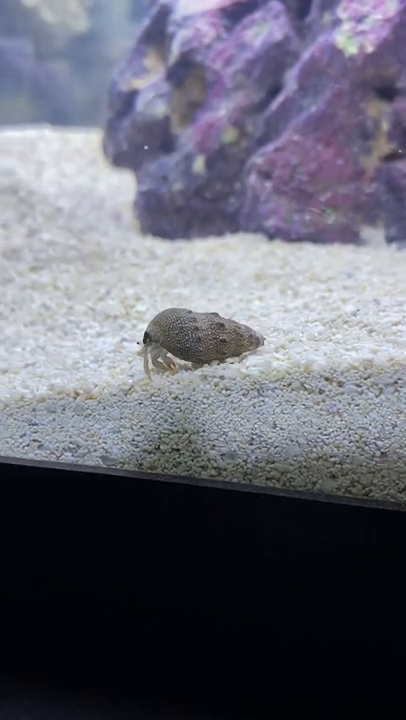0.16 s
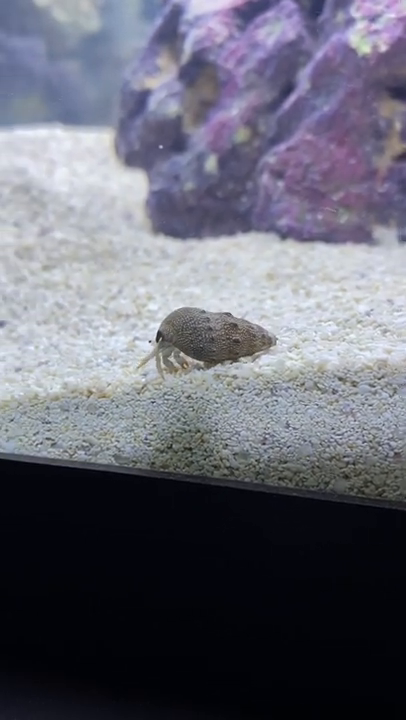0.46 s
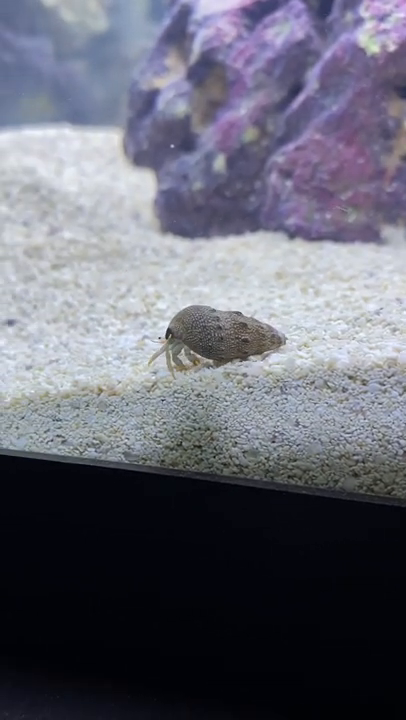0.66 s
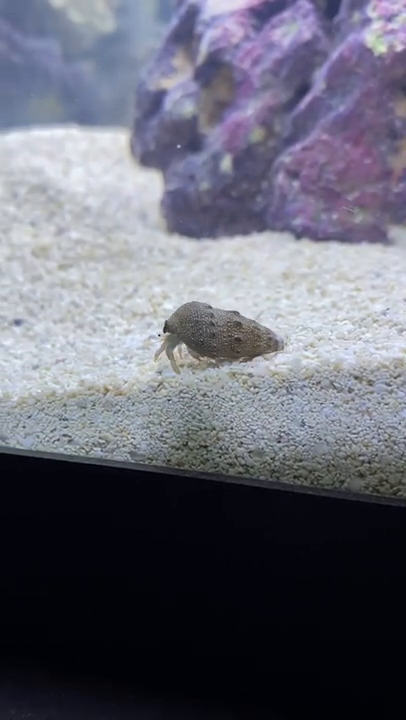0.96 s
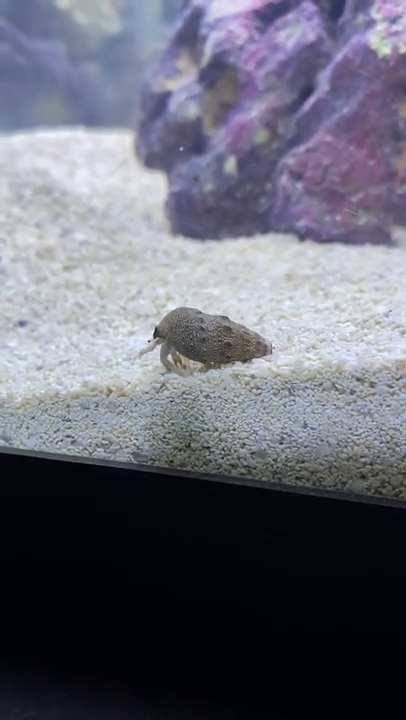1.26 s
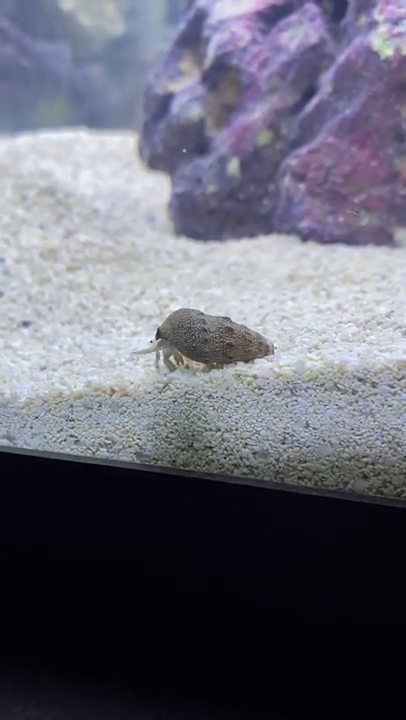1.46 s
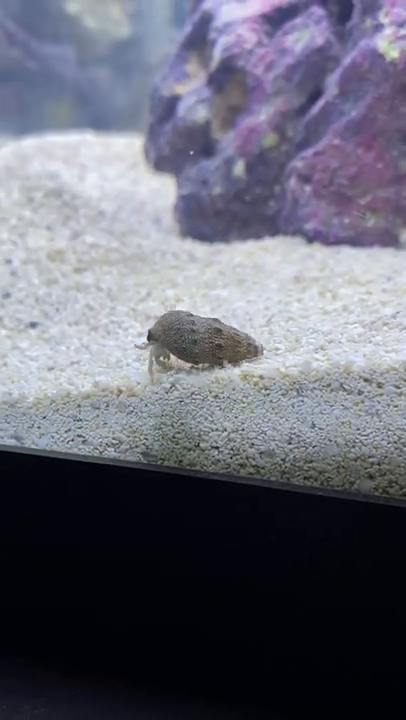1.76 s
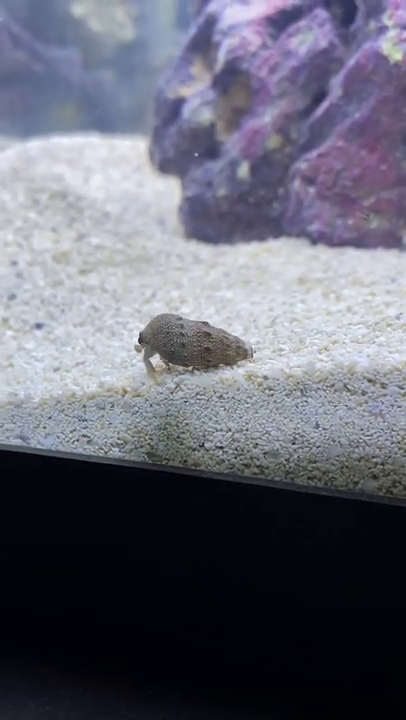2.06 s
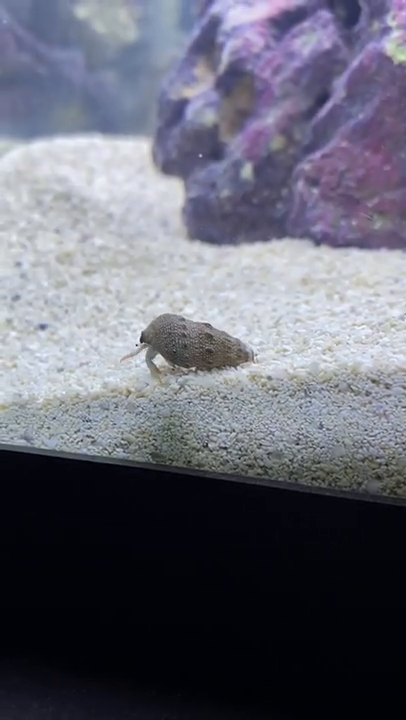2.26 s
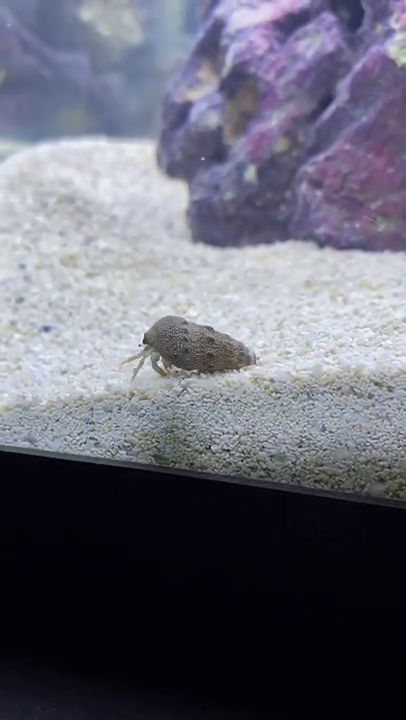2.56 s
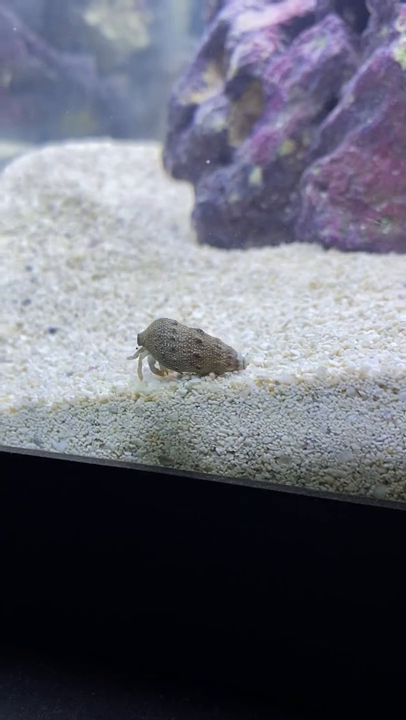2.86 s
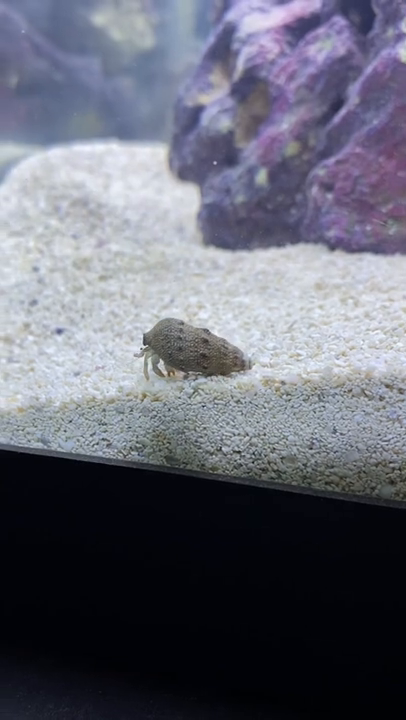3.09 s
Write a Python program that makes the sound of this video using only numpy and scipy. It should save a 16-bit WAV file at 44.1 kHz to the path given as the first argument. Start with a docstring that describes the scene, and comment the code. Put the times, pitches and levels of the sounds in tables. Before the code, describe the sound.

A steady low aquarium pump hum with gurgling filter water and irregular small clicks.

```python
"""An aquarium pump hums steadily in a small room, heard from just outside the tank.
Water rushes and burbles through the filter: shaped noise and short rising notes.
The impeller chatters on every turn, noise bursts ringing the housing; now and then it ticks sharply
in short runs, as if catching air: shaped noise cracks. A few tiny bubbles burst as pops and narrow fizz."""
import sys
import numpy as np
from scipy import signal
from scipy.fft import rfft, irfft
from scipy.io import wavfile
from scipy.ndimage import uniform_filter1d

SR = 44100
rng = np.random.default_rng(int(sys.argv[2]) if len(sys.argv) > 2 else 0)


def persist_wave(psi):
    """Save psi, clipped to +-1, as 16-bit WAV."""
    counts = np.round(np.clip(psi, -1, 1) * 32767).astype(np.int16)
    wavfile.write(sys.argv[1], SR, np.atleast_2d(counts).T)


N = 142443

TURN_HZ = 60.0


def amp(db):
    """Decibels to gain."""
    return 10 ** (np.asarray(db) / 20)


def evened(x):
    """Scales to an rms of one."""
    return x / np.sqrt(np.mean(x ** 2) + 1e-30)


def read(points, hz):
    """Reads a table along a logarithmic frequency axis."""
    f, value = np.transpose(points)
    return np.interp(np.log(hz + 1), np.log(f + 1), value)


def add(mix, start_s, sound):
    """Mixes a sound in at a given time."""
    part = mix[..., max(round(start_s * SR), 0):][..., :sound.shape[-1]]
    part += sound[..., :part.shape[-1]]


def coloured(x, points):
    """Filters by a table of frequency in Hz and gain in dB."""
    gain = amp(read(points, np.fft.rfftfreq(N, 1 / SR)))
    return irfft(rfft(x) * gain, N)


def drift(rate_hz):
    """Slow random motion, rms one, fading out above a rate."""
    hz = np.fft.rfftfreq(N, 1 / SR)
    lowpass = (hz > 0) / (1 + (hz / rate_hz) ** 4)
    return evened(irfft(rfft(rng.standard_normal(N)) * lowpass, N))


def follow(curve, share):
    """A gain of rms one that takes a share of a level curve's swings in dB."""
    s, db = np.transpose(curve)
    return evened(amp(share * np.interp(np.arange(N) / SR, s, db)))


def steadied(x, span_s):
    """Keeps a sound's level even over stretches longer than the span."""
    power = uniform_filter1d((x ** 2).mean(0), round(span_s * SR))
    power = uniform_filter1d(power, round(span_s * SR / 2))
    return x * np.sqrt(power.mean() / power)


def stereo_noise():
    """White noise as it reaches both microphones: alike in the bass, the middle leaning left."""
    # Likeness of the two microphones. Each row: frequency in Hz, likeness 0-1.
    likeness = [(130, .998), (280, .93), (450, .77), (700, .58), (950, .72), (1300, .4), (1600, .6),
                (2000, .85), (2500, .92), (3800, .55), (5500, .55), (6800, .92), (12000, .92)]
    # Balance of the two microphones. Each row: frequency in Hz, left minus right in dB.
    balance = [(150, -.2), (400, 0), (620, 3), (950, 3.8), (1400, 1.5), (2000, .3), (2500, 1.5), (3200, 0)]
    hz = np.fft.rfftfreq(N, 1 / SR)
    mid, side = rfft(rng.standard_normal((2, N)))
    same = np.clip(read(likeness, hz), 0, 1)
    lean = amp(read(balance, hz) / 2)
    mid = mid * np.sqrt((1 + same) / 2)
    side = side * np.sqrt((1 - same) / 2)
    return irfft(np.array([(mid + side) * lean, (mid - side) / lean]), N)


def room(x, apart=0.23):
    """Two wall echoes and a short diffuse tail, both duller than the direct sound."""
    # Reflections. Each row: delay in seconds, level in dB before dulling.
    echoes = [(0.0233, -13), (.068, -22)]
    t60_s, tail_db, onset_s = 0.21, -8, 0.0057
    t = np.arange(SR // 2) / SR
    tail = rng.standard_normal(len(t)) + apart * rng.standard_normal((2, len(t)))
    tail *= amp(-60 * t / t60_s) * np.minimum(t / onset_s, 1)
    tail *= amp(tail_db) / np.linalg.norm(tail[0])
    for delay_s, db in echoes:
        add(tail, delay_s, amp(db) * np.ones((2, 1)))
    wet = signal.fftconvolve(x, tail, axes=1)[:, :N]
    return coloured(wet, [(5000, -3), (10000, -2.0), (14000, -13)])  # Hz, dB


def hiss():
    """A faint, even hiss: shaped noise."""
    # Spectrum. Each row: frequency in Hz, density in dB per Hz.
    hiss_spectrum = [(2500, -130), (3700, -124), (5500, -125.5), (6400, -126), (7400, -135), (8600, -130),
                     (10200, -129), (12000, -132), (13000, -146), (15000, -160)]
    return coloured(stereo_noise(), hiss_spectrum) * np.sqrt(SR / 2)


def rumble():
    """A low uneven rumble of room and cabinet, surging together with the motor's shake at its turn rate."""
    # Spectrum of the bed before levelling. Each row: frequency in Hz, density in dB per Hz.
    rumble_spectrum = [(18, -104), (30, -101.5), (47, -74.5), (75, -79.5), (100, -77.5), (157, -78),
                       (200, -87.5), (400, -104), (1000, -140)]
    # Surges of the rumble; only the swings count. Each row: time in seconds, level in dB.
    rumble_level = [(0.03, -56), (0.11, -62.5), (0.22, -54), (0.42, -54.5), (.49, -48.5), (.65, -57),
                    (1.03, -47.5), (1.32, -56.5), (1.55, -50), (1.77, -61), (1.93, -51.5), (2.15, -56.5),
                    (2.3, -54.5), (2.45, -58), (2.61, -54.5), (2.72, -49), (2.8, -55), (3.0, -49.5),
                    (3.1, -59.5), (3.17, -52.5)]
    shake_db, wander_turns, steady_s, follow_share = -60, 0.087, 0.1, 0.85
    bed = coloured(stereo_noise(), rumble_spectrum) * np.sqrt(SR / 2)
    turns = TURN_HZ * np.arange(N) / SR + wander_turns * drift(7.2)
    shake = np.sqrt(2) * amp(shake_db) * np.cos(2 * np.pi * turns)
    return steadied(bed + shake, steady_s) * follow(rumble_level, follow_share)


def rush():
    """Flowing water: shaped noise, swelling a little and shifting in time-frequency patches."""
    # Spectrum of the water in the filter. Each row: frequency in Hz, density in dB per Hz.
    rush_spectrum = [(100, -110), (200, -87.5), (275, -80.5), (355, -89), (440, -87), (520, -92),
                     (640, -90.5), (790, -95), (1020, -99), (1150, -103), (1300, -110), (1700, -112),
                     (2150, -110), (2600, -111), (2850, -119), (3300, -119), (3650, -128), (5500, -140),
                     (9000, -170)]
    swell_db, patch_db = 1.34, 1.12
    z = signal.stft(stereo_noise(), nperseg=512)[2]
    patches = rng.standard_normal(z.shape[:0:-1])  # frames, bins
    patches = uniform_filter1d(patches, size=7, axis=0)
    patches = evened(uniform_filter1d(patches, size=5, axis=1)).T
    flow = signal.istft(z * amp(patch_db * patches), nperseg=512)[1][:, :N]
    return coloured(flow, rush_spectrum) * np.sqrt(SR / 2) * amp(swell_db * drift(6.1))


def burble():
    """Soft low bubbles shed one after another in the flow, each a short rising note."""
    per_s, base_db, range_db, tilt_db = 80, -70, 9.5, 1.5
    decay_cycles, glide, spread = 3, 0.08, 0.61
    low_hz, high_hz = 230, 1000
    out, t = np.zeros((2, N)), np.arange(3000) / SR
    draws = rng.random((round(per_s * N / SR), 4))
    for k, (late, pitch, size, side) in enumerate(draws):
        hz = low_hz * (high_hz / low_hz) ** pitch
        age = t * hz / decay_cycles
        note = np.sin(2 * np.pi * hz * t * (1 + glide * age / 2))
        note *= np.exp(-age) * np.minimum(2 * age, 1)
        level = amp(base_db + range_db * size ** 2 - tilt_db * pitch)
        pan = 1 + spread * (side - 0.5) * np.array([[1], [-1]])
        add(out, (k + 2 * late) / per_s, note * level * pan)
    return out


def water():
    """Rush and steadied burble make one flow that swells slowly."""
    # Swells of the flow; only the swings count. Each row: time in seconds, level in dB.
    flow_level = [(0, -55.5), (.32, -56), (.6, -57), (1.05, -55.5), (1.2, -54.5), (1.36, -59.5),
                  (1.48, -56), (1.58, -55), (1.92, -56), (2.1, -56.5), (2.5, -56.5), (2.85, -58.5),
                  (3.15, -57)]
    follow_share, steady_s = 0.75, 0.1
    return (rush() + steadied(burble(), steady_s)) * follow(flow_level, follow_share)


def bubbles():
    """Tiny bubbles burst at the surface, each a dull pop and a short narrow fizz."""
    # Bursts. Each row: start in seconds, fizz pitch in Hz, level in dB before the fizz and pop gains.
    bursts = [(0.939, 6320, -87), (.958, 6300, -86.5), (2.465, 6100, -85), (2.482, 6250, -95)]
    # Colour of the pop as a bubble opens. Each row: frequency in Hz, gain in dB.
    pop_colour = [(300, -9), (900, 0), (1400, -13), (2500, 1), (3600, -11), (6000, -8), (9000, -25.5),
                  (14000, -36)]
    fizz_gain_db, fizz_fall_s, width_hz = 11.5, 0.0092, 290
    pop_gain_db, pop_fall_s = 9.5, 0.0045
    out, pops, t = np.zeros((2, N)), np.zeros(N), np.arange(4000) / SR
    for start_s, hz, db in bursts:
        band = signal.butter(2, [hz - width_hz / 2, hz + width_hz / 2], "band", fs=SR)
        fizz = evened(signal.lfilter(*band, rng.standard_normal(len(t))))
        add(out, start_s, amp(db + fizz_gain_db) * np.exp(-t / fizz_fall_s) * fizz)
        add(pops, start_s, amp(db + pop_gain_db) * np.exp(-t / pop_fall_s))
    return out + coloured(pops * stereo_noise(), pop_colour)


def ticks():
    """Brief impeller cracks, brighter when strong, with gritty tails; weak ones trail off in a soft fizz."""
    # Sharp ticks. Each row: start in seconds, level in dB before tick_gain_db,
    # housing knock in dB re that level, body of the crack in dB re that level.
    sharp_ticks = [(0.0158, -60, -10, -1), (0.0318, -59.5, -13, 5.5), (0.349, -68, 7.5, -5),
                   (0.3653, -71, 10, -1), (0.383, -65.5, -3, -1), (.434, -76, 3, 3), (.484, -77, 5, 6),
                   (.5504, -63.5, 3, 6), (0.5662, -62.5, 8, -1), (.5834, -58.5, 2, 0),
                   (0.7334, -51.5, -1.5, -2.5), (.757, -66, 0, 2), (0.8006, -63.5, -3, 2),
                   (.85, -58, 4, 0.5), (1.1344, -68, 8, 3), (1.151, -66, 4, 2), (1.216, -56.5, -5, -1),
                   (1.2329, -51.5, 0, -3.5), (1.283, -76, 2.5, 0), (1.415, -74.5, 7, -2),
                   (1.449, -71, 10.5, -2), (1.4817, -69.5, -5, 0), (1.498, -69.5, -4.5, 1),
                   (1.7, -67, 9, 2), (1.8338, -60.5, 4, -2), (1.8502, -58.5, 0, -2), (1.885, -60.5, 5, -3),
                   (1.899, -52, -10, -4), (1.916, -50.5, -2.5, -5), (1.94, -75, 1, -5),
                   (2.0339, -57, 5.5, 1), (2.0498, -63.5, 4, -5), (2.234, -71, 9.5, 7), (2.2655, -70, 7, 4),
                   (2.316, -66, 10, 11), (2.4327, -70, 1, 6.5), (2.684, -53, -1, -4), (2.8337, -69, -1, 6),
                   (2.9, -63, 5, 7), (2.916, -64, 5, 3), (3.001, -62.5, 2, 5), (3.016, -68.5, 7, -7),
                   (3.067, -59.5, 3, 8.5), (3.116, -66, -6, -2), (3.1665, -70.5, 14, -2)]
    # Colours of crack, housing knock and body under the crack. Each row: frequency in Hz, gain in dB.
    crack_colour = [(4000, -30.5), (7400, -8.5), (8500, -3), (10000, 0.5), (11800, -1), (13600, -2.5),
                    (15300, -2.5), (16500, -7)]
    knock_colour = [(300, -9.5), (600, -7.5), (950, 4.5), (1500, 1.5), (2000, 2), (2600, 5), (3300, -10),
                    (5800, -24.5), (8000, -41)]
    body_colour = [(2500, -24.5), (4400, -9), (5300, -14.5), (6300, -8), (7400, -23.5), (10000, -41)]
    # Extra colour of the soft share, on top of the crack's. Each row: frequency in Hz, gain in dB.
    soft_loss = [(8000, -3.5), (10300, 1), (12000, -3), (13500, -15), (16000, -28)]
    tick_gain_db, soft_below_db = -5, -63
    rise_s, fall_s, ring_s, ring_db = 0.00078, 0.0022, 0.0061, -4.5
    soft_tail_db, soft_tail_s = -7, 0.04
    hard_tail_db, hard_tail_s = -25.5, 0.032
    knock_tail_db, knock_tail_s = -16.5, 0.013
    grit_db, grit_rate_hz, grit_from_s = 2, 350, 0.0045
    faint_db, faint_spread_db = -91, 6  # before colouring

    t = np.arange(SR // 8) / SR
    age, rise = np.maximum(t - rise_s, 0), np.minimum(t / rise_s, 1)
    shape = rise * (np.exp(-age / fall_s) + amp(ring_db) * np.exp(-age / ring_s))
    fizz = rise * amp(soft_tail_db) * np.exp(-age / soft_tail_s)
    scrape = rise * amp(hard_tail_db) * np.exp(-age / hard_tail_s)
    rattle = rise * amp(knock_tail_db) * np.exp(-age / knock_tail_s)
    grain_db = grit_db * drift(grit_rate_hz)
    hard, soft, knock, body = np.zeros((4, N))  # power envelopes
    for start_s, db, knock_db, body_db in sharp_ticks:
        power = amp(db + tick_gain_db) ** 2
        softness = 1 / (1 + amp(db - soft_below_db) ** 10)
        grain = np.roll(grain_db, -round(start_s * SR))[:len(t)]
        grit = amp(grain * np.minimum(age / grit_from_s, 1)) ** 2
        add(hard, start_s, power * (1 - softness) * (shape ** 2 + scrape ** 2) * grit)
        add(soft, start_s, power * softness * (shape ** 2 + fizz ** 2) * grit)
        add(knock, start_s, power * amp(knock_db) ** 2 * (shape ** 2 + rattle ** 2))
        add(body, start_s, power * amp(body_db) ** 2 * shape ** 2)
    for start_s in np.arange(0, N / SR, 1 / TURN_HZ):  # a faint tick on every turn
        level = amp(faint_db + faint_spread_db * rng.standard_normal())
        add(soft, start_s, (level * shape) ** 2)
    hard, soft, knock, body = [stereo_noise() * np.sqrt(power) for power in (hard, soft, knock, body)]
    crack = coloured(hard + coloured(soft, soft_loss), crack_colour)
    return crack + coloured(knock, knock_colour) + coloured(body, body_colour)


def chatter():
    """On every turn the impeller scuffs the housing with uneven force, ringing its resonances."""
    # Housing resonances. Each row: frequency in Hz, width in Hz, level in dB, strike point in the turn 0-1.
    housing = [(596.6, 25, -77, 0.3), (852, 25, -79, .08), (930.4, 48, -71, .08), (1011, 25, -77.5, .1),
               (1165, 59, -83.5, 0.01), (1880, 180, -87.5, .15), (2139, 65, -87.5, .08),
               (2427, 87, -81.5, .06), (2519, 70, -84.5, .42), (3200, 76, -97, 0.3)]
    # How hard the water churns through the pump; only the swings count.
    # Each row: time in seconds, level in dB.
    churn_level = [(0.03, -61.5), (0.15, -71), (0.25, -62.5), (0.29, -68), (0.34, -63.5), (0.54, -68),
                   (0.57, -58.5), (0.67, -71.5), (0.74, -62), (1.07, -69.5), (1.24, -61), (1.29, -68.5),
                   (1.76, -63.5), (2.61, -64), (2.63, -68.5), (3.18, -62)]
    # Rasp of the upper resonances; only the swings count. Each row: time in seconds, level in dB.
    rasp_level = [(0.03, -70), (0.06, -83.5), (0.34, -75.5), (0.55, -80), (0.58, -72.5), (0.7, -81),
                  (0.73, -75), (1.12, -79.5), (1.14, -75), (1.21, -85.5), (1.24, -65), (1.25, -72),
                  (1.28, -77.5), (1.88, -76.5), (1.92, -65), (1.93, -75.5), (2.02, -80), (2.03, -70),
                  (2.09, -76), (2.37, -79.5), (2.4, -85), (2.47, -73.5), (2.82, -86), (2.9, -76.5),
                  (3.19, -78), (3.2, -86.5)]
    scuff_fall_s, uneven_db, swell_db = 0.002, 2, 1.1
    churn_share, rasp_share, rasp_from_hz = 1, 0.75, 1500
    turns, out = TURN_HZ * np.arange(N) / SR, np.zeros((2, N))
    per_turn_db = uneven_db * rng.standard_normal(N)[turns.astype(int)]
    force = amp(per_turn_db + swell_db * drift(6.8))
    churn, rasp = follow(churn_level, churn_share), follow(rasp_level, rasp_share)
    for hz, width_hz, db, point in housing:
        since_strike_s = ((turns - point) % 1) / TURN_HZ
        drive = force * (rasp if hz > rasp_from_hz else churn)
        scuffs = stereo_noise() * drive * np.exp(-since_strike_s / scuff_fall_s)
        ring = signal.lfilter(*signal.iirpeak(hz, hz / width_hz, SR), scuffs)
        ring = signal.lfilter(*signal.iirpeak(hz, hz / width_hz / 2, SR), ring)
        out += amp(db) * evened(ring)
    return out


def hum():
    """The motor shakes the tank, mostly at twice its turn rate: wavering harmonic tones."""
    # Harmonics. Each row: multiple of the turn rate, rms level in dB, waver in dB.
    harmonics = [(2, -45.5, -0.06), (4, -69.5, 0.5)]
    # Level of the hum; only the swings count. Each row: time in seconds, level in dB.
    hum_level = [(0.06, -46), (0.4, -45), (0.43, -46), (1.3, -46.5), (1.48, -47), (1.53, -45.5),
                 (2.08, -47), (2.41, -45), (2.47, -48.5), (2.51, -46.5), (2.94, -46.5), (3.05, -51),
                 (3.09, -44), (3.18, -47.5)]
    follow_share = 0.99
    turns, out = TURN_HZ * np.arange(N) / SR, np.zeros(N)
    for k, db, waver_db in harmonics:
        level = np.sqrt(2) * amp(db + waver_db * drift(14))
        out += level * np.cos(2 * np.pi * (round(k) * turns + rng.random()))
    return out * follow(hum_level, follow_share)


def scene():
    """Pump and water, with ticks and bubbles echoing in the room."""
    bright = ticks() + bubbles()
    return hiss() + rumble() + water() + chatter() + hum() + bright + room(bright)


def record(dry):
    """The two microphones hear the treble out of step; then the band limit."""
    # Phase between the microphones. Each row: frequency in Hz, lead of the left in radians.
    left_lead = [(20, 0), (60, .02), (120, .08), (500, .1), (800, -.35), (1000, -.15), (1200, -1.3),
                 (1550, .1), (2070, .2), (2500, 1.15), (3200, .7), (5400, .6), (6500, 2.3), (7250, 3.14),
                 (8100, 3.9), (9700, 5.8), (11500, 6.9), (12500, 8.4), (13700, 9.45), (15300, 11.9)]
    edge_hz = 16500
    lead = read(left_lead, np.fft.rfftfreq(N, 1 / SR))
    pair = irfft(rfft(dry) * np.exp(0.5j * np.array([lead, -lead])), N)
    lowpass = signal.firwin(511, edge_hz, window=("kaiser", 9), fs=SR)
    return signal.oaconvolve(pair, lowpass[None], "same")


dry = scene()
out = record(dry)
persist_wave(out)
```